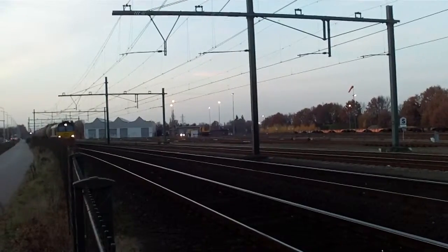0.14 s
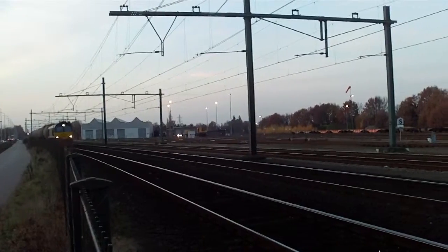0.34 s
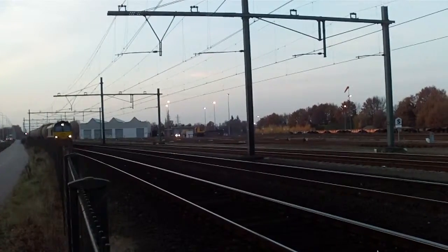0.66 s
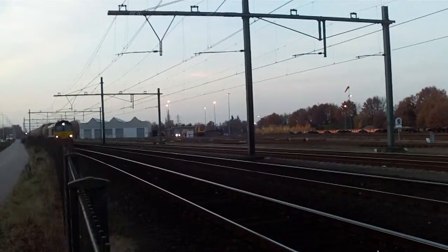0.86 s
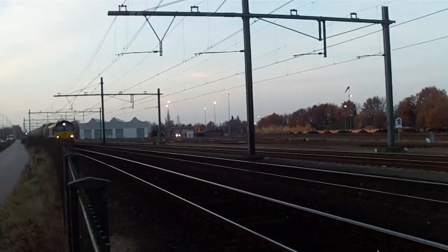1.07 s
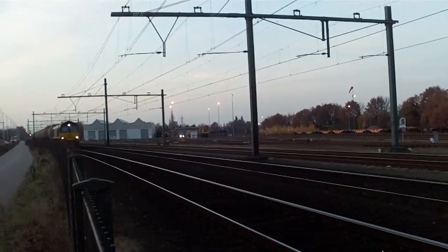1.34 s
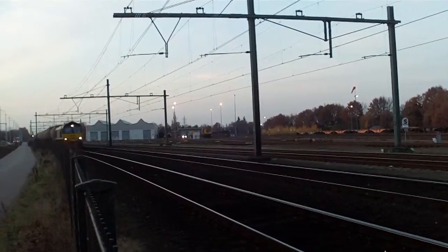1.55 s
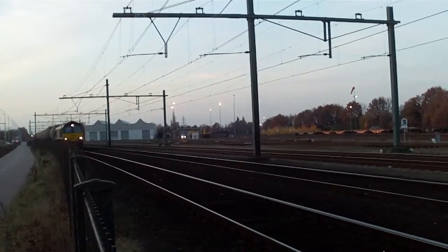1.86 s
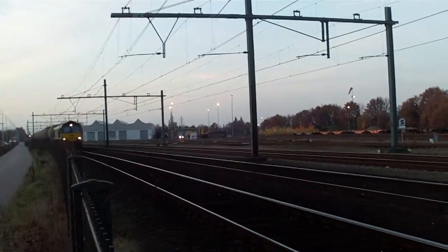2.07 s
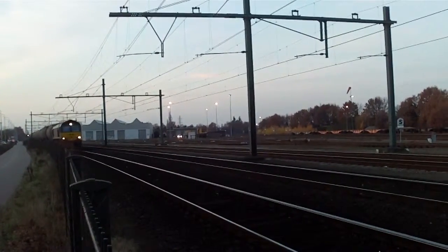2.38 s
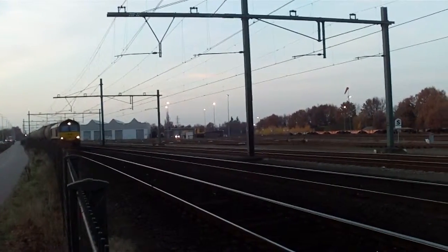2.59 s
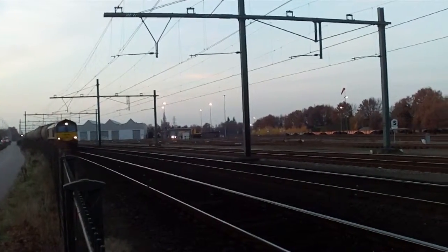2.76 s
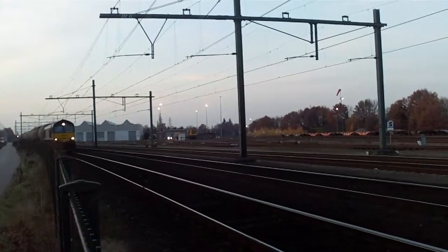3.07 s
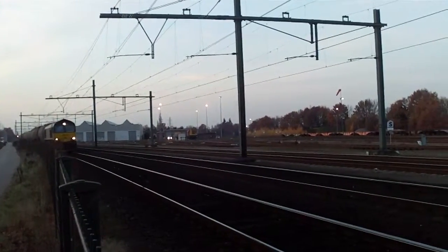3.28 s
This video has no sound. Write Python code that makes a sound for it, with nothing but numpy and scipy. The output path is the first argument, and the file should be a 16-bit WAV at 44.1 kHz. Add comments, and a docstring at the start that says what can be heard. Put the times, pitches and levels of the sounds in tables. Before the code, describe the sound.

A distant diesel locomotive approaches with a steady low throb, a soft roar and a faint whine. Wind buffets the microphone in uneven low thumps throughout, over a light open-air hiss. From about 1.3 seconds the rush of the wheels grows. Around 2.7 seconds a gust softly rustles dry grass nearby, and the rails ring faintly as the wind rises until the end at about 3.4 seconds.

```python
"""An open rail yard: a diesel freight locomotive creeps closer, still far away.
Its exhaust throbs once per crankshaft turn, its blowers whine faintly, and the wheels roar and
sing on the rails. Wind buffets the microphone over the hiss of open air. Towards the end a gust
sets the dry grass by the track rustling."""
import sys
import numpy as np
from scipy import signal
from scipy.io import wavfile

SR = 44100
rng = np.random.default_rng(int(sys.argv[2]) if len(sys.argv) > 2 else 0)


def put_to_file(sound):
    """Save the sound as 16-bit audio at rate SR, in the file named by the first command-line argument."""
    columns = np.atleast_2d(sound).T  # one column per channel
    safe = np.clip(columns, -1, 1)
    whole_steps = np.round(safe * 32767)
    wavfile.write(sys.argv[1], SR, whole_steps.astype(np.int16))


N = 151263
T = np.arange(N) / SR

# Exhaust partials. Each row: multiple of the crankshaft rate, relative level in dB.
EXHAUST_ORDERS_DB = [(3, -13), (4, -6.5), (5, -4.5), (6, 2), (7, -1.5), (8, -2), (9, -12.5), (10, -18),
                     (14, -20), (16, -20.5)]
# Exhaust loudness. Each row: time in seconds, gain in dB.
EXHAUST_GAIN_DB = [(0, -34.5), (.8, -33), (1.5, -31.5), (2.1, -33.5), (2.9, -32.5), (3.43, -31.5)]
# Blower tones. Each row: frequency in Hz, level in dB before the gain below.
BLOWER_TONES_DB = [(522.2, -52), (866.7, -55), (1287, -60.5), (1733, -59.5)]
# How well the blower carries. Each row: time in seconds, gain in dB.
BLOWER_GAIN_DB = [(0, -5), (.4, -1), (.8, 1.5), (1.25, 1), (1.7, -4), (2.15, -3.5), (3.43, -5)]
# Far roar of the train. Each row: frequency in Hz, relative density in dB.
ROAR_SPECTRUM_DB = [(150, 4), (250, 4), (400, -1.5), (520, 0.5), (700, 4), (900, 2.5), (1200, -4),
                    (1800, -7.5), (2500, -18.5), (3500, -25.5), (6000, -36)]
# Roar loudness. Each row: time in seconds, level in dB.
ROAR_LEVEL_DB = [(0, -40), (1, -40), (1.8, -41.5), (2.5, -39), (2.9, -39.5), (3.43, -38.5)]
# Rush of the wheels. Each row: frequency in Hz, relative density in dB.
WHEEL_SPECTRUM_DB = [(700, -21), (1100, 1), (1500, 7), (2200, 4), (2700, -2.5), (3400, -18), (5000, -11)]
# Wheel loudness. Each row: time in seconds, level in dB.
WHEEL_LEVEL_DB = [(0, -54.5), (.95, -53.5), (1.3, -46.5), (1.8, -46.5), (2.3, -43), (2.6, -44.5),
                  (2.9, -48.5), (3.43, -43)]
# Ringing bands of the rails. Each row: centre in Hz, width in Hz, relative level in dB.
RAIL_BANDS_DB = [(846, 40, -14), (939, 210, -4), (1101, 150, -11), (1390, 400, -11)]
# Ringing loudness. Each row: time in seconds, gain in dB.
RAIL_GAIN_DB = [(0, -69), (1.5, -46.5), (2.5, -47), (2.85, -40.5), (3.1, -39), (3.28, -32.5), (3.43, -38)]
# Wind on the microphone. Each row: frequency in Hz, relative density in dB.
WIND_SPECTRUM_DB = [(12, 3.5), (28, -3), (45, -1), (70, -9.5), (100, -14), (150, -18.5), (220, -26.5),
                    (400, -36)]
# Wind loudness. Each row: time in seconds, level in dB.
WIND_LEVEL_DB = [(0, -20.5), (.35, -23), (.6, -21.5), (.75, -26.5), (1.15, -26.5), (1.42, -25.5),
                 (1.65, -27.5), (1.95, -24), (2.2, -27), (2.5, -26.5), (2.92, -22.5), (3.05, -21.5),
                 (3.25, -21.5), (3.43, -17)]
# Single eddies. Each row: centre in seconds, envelope peak in dB, frequency in Hz, sigma in seconds.
EDDIES = [(.058, -14.5, 30.6, 0.037), (.06, -34, 264, 0.019), (0.101, -23, 126.2, 0.019),
          (.145, -22, 138, 0.012), (.278, -18.5, 113, 0.0049), (0.347, -15.5, 37.4, .018),
          (0.431, -12, 31.7, 0.012), (0.544, -15, 41.5, 0.012), (.607, -13.5, 101, 0.0054),
          (.63, -28, 177, 0.013), (1.479, -14, 44, 0.0095), (1.929, -17, 24.3, 0.018),
          (2.311, -13, 48.4, .011), (2.669, -13.5, 34.8, 0.017), (2.926, -14.5, 82.6, 0.014),
          (2.944, -9, 34.3, 0.011), (3.119, -12.5, 55.3, 0.013), (3.32, -12.5, 47, 0.018),
          (3.373, -9.5, 27.3, 0.021), (3.385, -20.5, 137, 0.0073)]
# Hiss of open air. Each row: frequency in Hz, relative density in dB.
AIR_SPECTRUM_DB = [(2000, 10.5), (3500, 5.5), (5000, -0.5), (7000, -2), (9500, -2), (12000, -7),
                   (15500, -15)]
# Hiss loudness. Each row: time in seconds, level in dB.
AIR_LEVEL_DB = [(0, -49.5), (.25, -51.5), (.7, -51.5), (1.65, -53.5), (2.05, -53.5), (2.5, -52),
                (3.43, -47)]
# Grass in the gust. Each row: frequency in Hz, relative density in dB.
GRASS_SPECTRUM_DB = [(1500, 5.5), (2500, 6.5), (3500, 4), (5500, -0.5), (7500, -2.5), (10000, -10.5),
                     (12500, -21), (15500, -18)]
# Grass loudness. Each row: time in seconds, level in dB.
GRASS_LEVEL_DB = [(0, -84), (2.55, -67), (2.67, -46.5), (2.8, -43.5), (2.93, -42), (3.12, -44.5),
                  (3.43, -49)]
# Short rustles. Each row: centre in seconds, level in dB, centre in Hz, half-width in octaves,
# sigma in seconds.
GRASS_RUSTLES = [(.25, -60.5, 9900, 0.41, 0.05), (1.391, -48.5, 4030, .07, .005),
                 (1.415, -47, 4120, 0.045, .005), (1.404, -57, 5440, 0.53, 0.026),
                 (1.935, -60, 9500, 0.28, .018), (2.301, -52.5, 8300, 0.4, 0.023),
                 (2.71, -54.5, 9700, 0.28, 0.13), (2.86, -52.5, 8950, 0.28, .055)]
# Dry stalks ticking. Each row: start in seconds, relative level in dB, band centre in Hz.
STALK_TICKS = [(.1731, -46, 14000), (.9368, -51, 14000), (1.9959, -47, 14000), (2.0987, -42, 11500),
               (2.8016, -39, 11000), (2.919, -29, 7450), (3.082, -34, 7000)]


def from_db(db):
    """Decibels to gain."""
    return 10 ** (np.asarray(db) / 20)


def unit_rms(x):
    """Scale to rms 1."""
    return x / np.sqrt(np.mean(x ** 2) + 1e-20)


def gain_curve(rows):
    """Gain over time from (s, dB) rows."""
    return from_db(np.interp(T, *np.transpose(rows)))


def drift(rate_hz):
    """Random wander of rms about 1, low-passed at rate_hz."""
    hop, warmup = 40, 2000
    pole = np.exp(-2 * np.pi * rate_hz * hop / SR)
    white = rng.standard_normal(N // hop + warmup + 2)
    slow = signal.lfilter([1], [1, -2 * pole, pole * pole], white)[warmup:]
    return np.interp(np.arange(N) / hop, np.arange(len(slow)), unit_rms(slow))


def band_noise(low_hz, high_hz):
    """Band-passed noise, rms 1."""
    sos = signal.butter(2, [low_hz, min(high_hz, .47 * SR)], "band", fs=SR, output="sos")
    return unit_rms(signal.sosfilt(sos, rng.standard_normal(N + SR // 2))[-N:])


def coloured_noise(spectrum, flicker_db, flicker_hz):
    """Third-octave noise bands, each flickering on its own; rms 1."""
    hz, db = np.transpose(spectrum)
    edges_hz = 10 * 2 ** (np.arange(34) / 3)
    out = np.zeros(N)
    for low, high in zip(edges_hz, edges_hz[1:]):
        if high > hz[0] and low < hz[-1]:
            band_db = np.interp(np.log(low * high) / 2, np.log(hz), db)
            gain = np.sqrt(high - low) * from_db(band_db + flicker_db * drift(flicker_hz))
            out += gain * band_noise(low, high)
    return unit_rms(out)


def swell(centre_s, sigma_s):
    """Gaussian envelope, peak 1."""
    return np.exp(-.5 * ((T - centre_s) / sigma_s) ** 2)


def exhaust(crank_hz=10.95, first_beat_s=.02137, pipe_hz=76.05):
    """One beat per crankshaft turn, lows trailing; the partials waver on their way through the air."""
    smear_rad, waver_rad, waver_db = .329, .23, 2
    out = np.zeros(N)
    for order, db in EXHAUST_ORDERS_DB:
        hz = order * crank_hz
        pipe_rad = smear_rad * ((hz - pipe_hz) / crank_hz) ** 2  # phase bend about the pipe resonance
        phase = 2 * np.pi * hz * (T - first_beat_s) + pipe_rad + waver_rad * drift(.63)
        out += from_db(db + waver_db * drift(1.48)) * np.sqrt(2) * np.sin(phase)
    return gain_curve(EXHAUST_GAIN_DB) * out


def blower(waver_hz=1.1, waver_db=2.9):
    """Thin tones that fade in and out with the wind."""
    out = np.zeros(N)
    for hz, db in BLOWER_TONES_DB:
        phase = 2 * np.pi * np.cumsum(hz + waver_hz * drift(7.5)) / SR
        out += from_db(db + waver_db * drift(3.4)) * np.sqrt(2) * np.sin(phase)
    return gain_curve(BLOWER_GAIN_DB) * out


def rolling():
    """Wheels on rails: far roar, brighter rush and ringing bands that swell as the train nears."""
    roar = gain_curve(ROAR_LEVEL_DB) * coloured_noise(ROAR_SPECTRUM_DB, flicker_db=.3, flicker_hz=8.2)
    rush = gain_curve(WHEEL_LEVEL_DB) * coloured_noise(WHEEL_SPECTRUM_DB, flicker_db=1.15, flicker_hz=14)
    ring = sum(from_db(db) * band_noise(hz - width_hz / 2, hz + width_hz / 2)
               for hz, width_hz, db in RAIL_BANDS_DB)
    return roar + rush + gain_curve(RAIL_GAIN_DB) * ring


def wind(wobble_rad=.35, wobble_hz=30):
    """Lumpy rumble on the microphone; each strong eddy pushes and pulls the diaphragm."""
    out = gain_curve(WIND_LEVEL_DB) * coloured_noise(WIND_SPECTRUM_DB, flicker_db=1.5, flicker_hz=7.5)
    for centre_s, db, hz, sigma_s in EDDIES:
        phase = 2 * np.pi * hz * (T - centre_s) + wobble_rad * drift(wobble_hz)
        out += from_db(db) * swell(centre_s, sigma_s) * np.sin(phase)
    return out


def air():
    """Faint, continuous hiss of open air."""
    return gain_curve(AIR_LEVEL_DB) * coloured_noise(AIR_SPECTRUM_DB, flicker_db=1.5, flicker_hz=6.7)


def grass(grain_db=1, grain_hz=200):
    """Dry grass: short rustles and a grainy hiss under the gust."""
    out = gain_curve(GRASS_LEVEL_DB) * coloured_noise(GRASS_SPECTRUM_DB, flicker_db=.2, flicker_hz=22)
    for centre_s, db, hz, octaves, sigma_s in GRASS_RUSTLES:
        out += from_db(db) * swell(centre_s, sigma_s) * band_noise(hz / 2 ** octaves, hz * 2 ** octaves)
    return out * from_db(grain_db * drift(grain_hz))


def stalks(decay_s=.0016):
    """Dry stalks tick: bright noise bursts, sharp onset, fast decay."""
    out = np.zeros(N)
    for start_s, db, hz in STALK_TICKS:
        envelope = (T >= start_s) * np.exp(-np.abs(T - start_s) / decay_s)
        out += from_db(db) / 2 * envelope * band_noise(hz * .7, hz * 1.35)
    return out


def scene():
    """Far train; wind, air and grass close by. Mono."""
    return (exhaust() + blower() + rolling() + wind() + air() + grass() + stalks())[None]


def record(dry, fade_s=.006, cutoff_hz=15700):
    """Fade both ends, then low-pass steeply."""
    ramp = np.clip(np.minimum(T, T[-1] - T) / fade_s, 0, 1)
    fade = np.sin(np.pi / 2 * ramp) ** 2
    lowpass = signal.ellip(12, .1, 80, cutoff_hz, fs=SR, output="sos")
    return signal.sosfilt(lowpass, dry * fade)


dry = scene()
out = record(dry)
put_to_file(out)
```